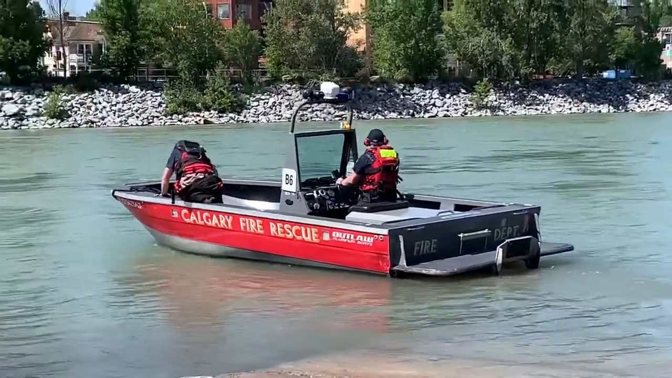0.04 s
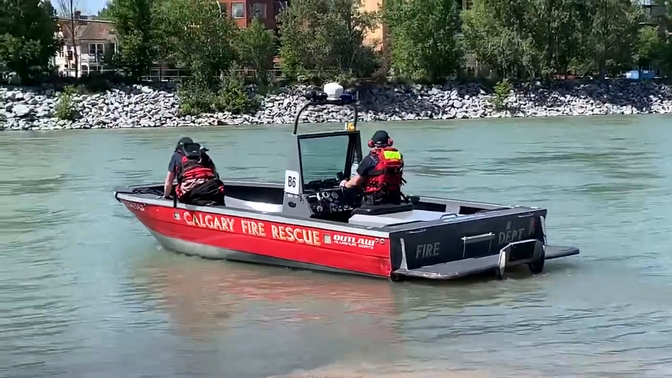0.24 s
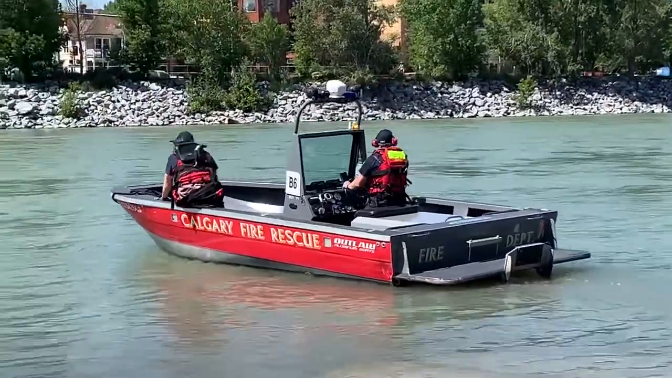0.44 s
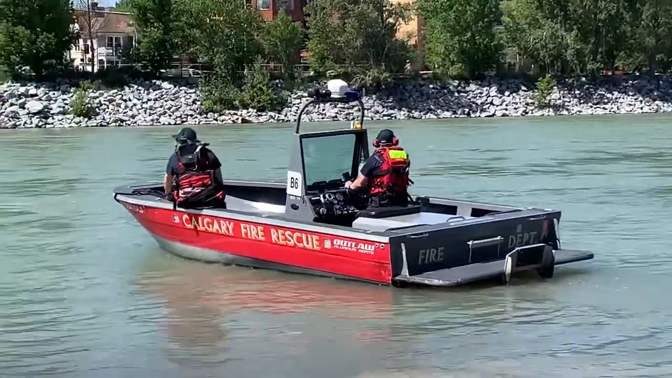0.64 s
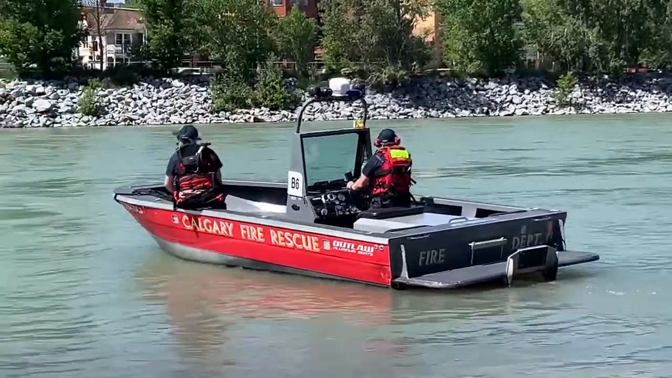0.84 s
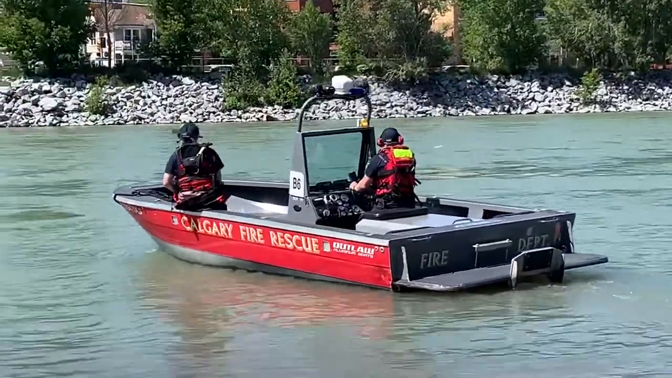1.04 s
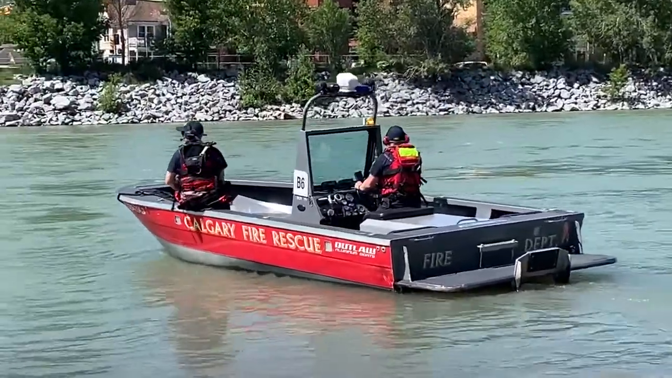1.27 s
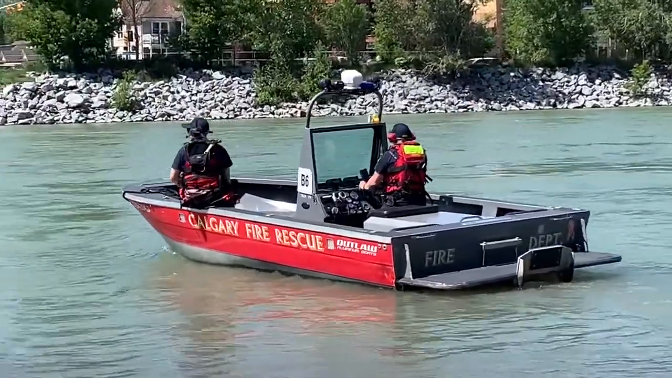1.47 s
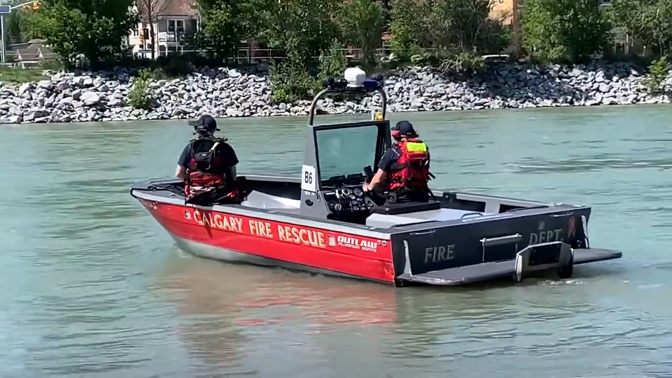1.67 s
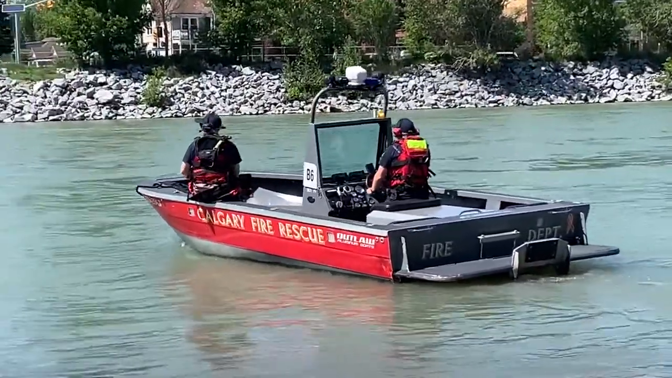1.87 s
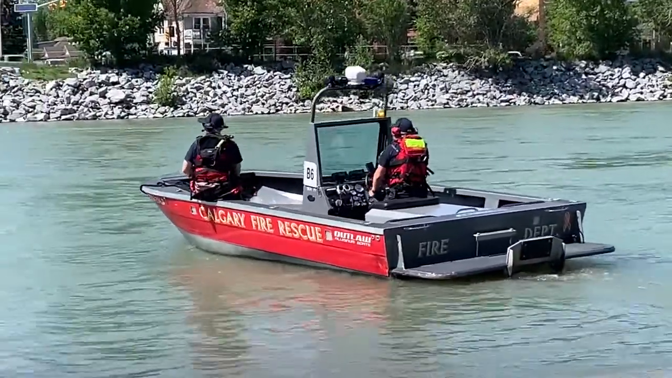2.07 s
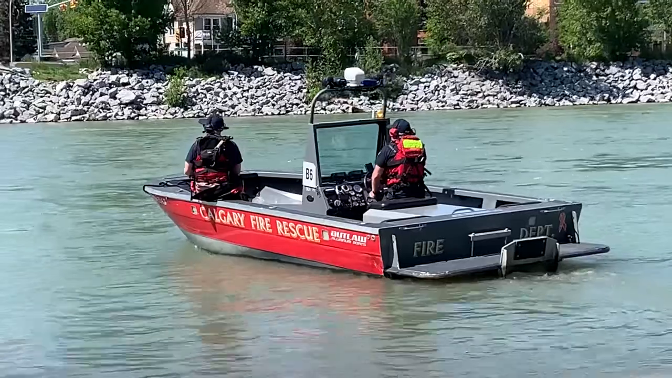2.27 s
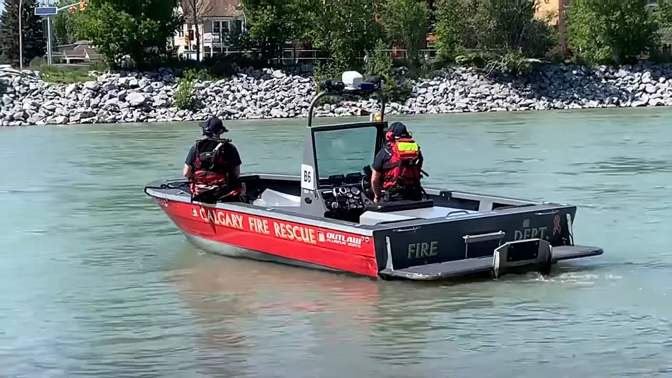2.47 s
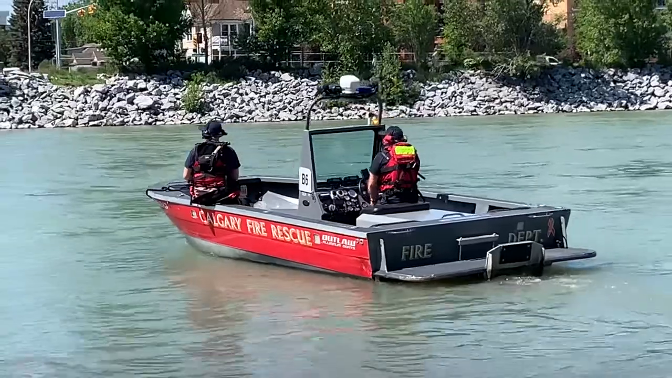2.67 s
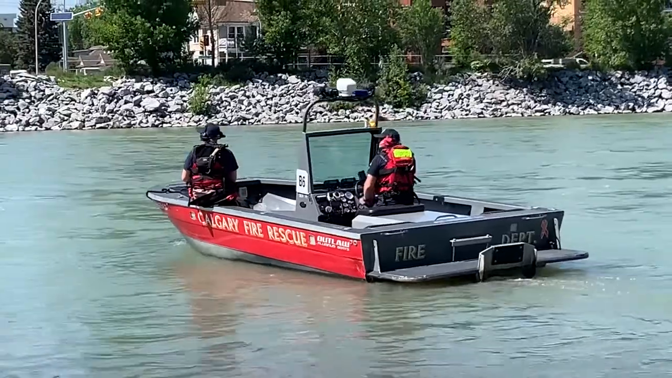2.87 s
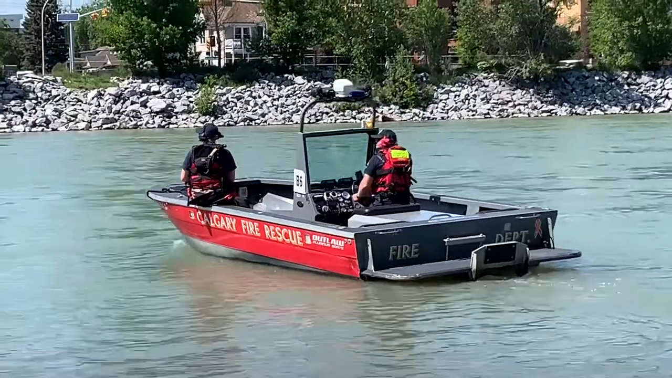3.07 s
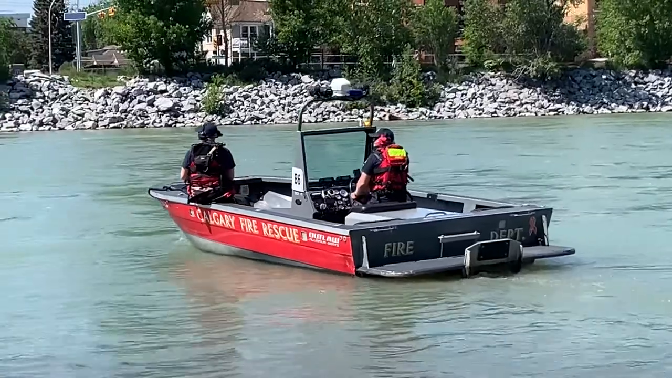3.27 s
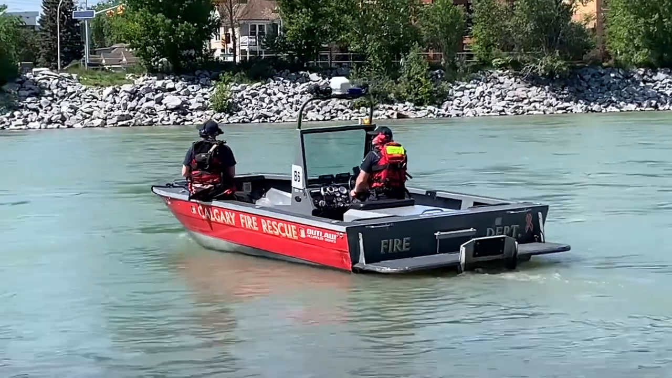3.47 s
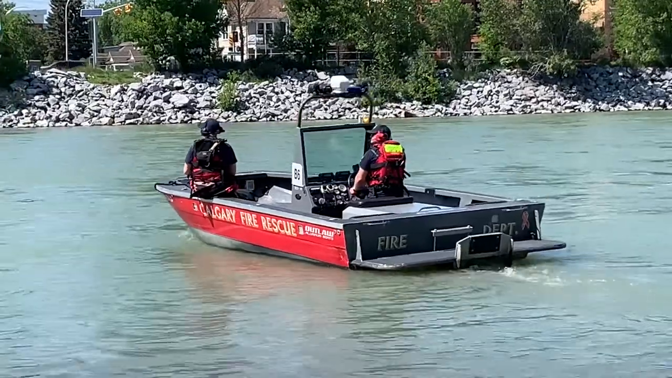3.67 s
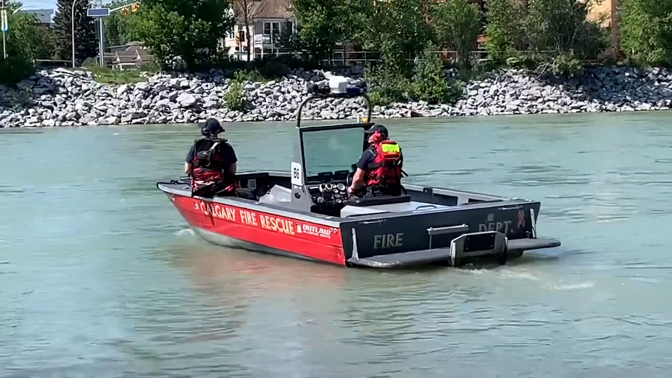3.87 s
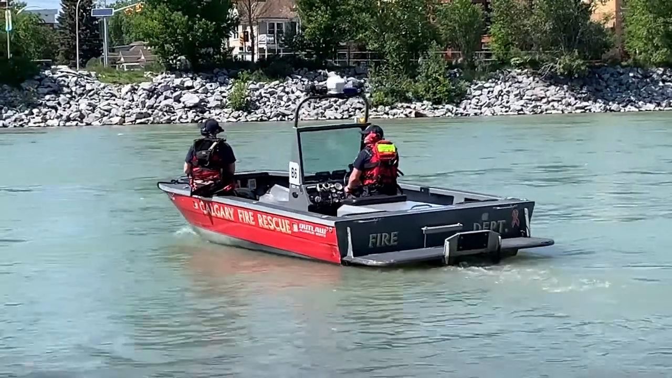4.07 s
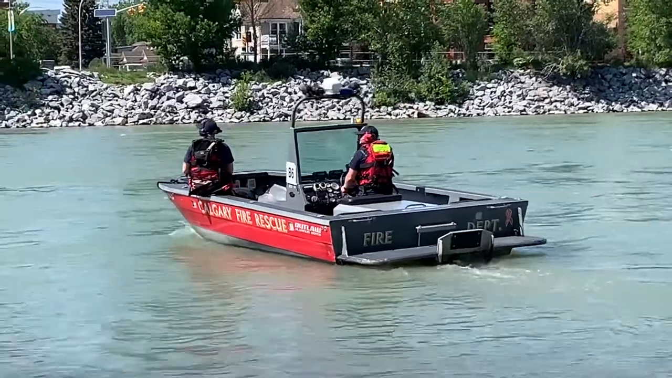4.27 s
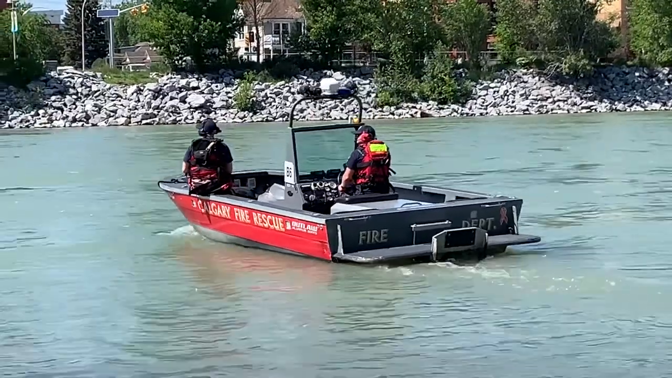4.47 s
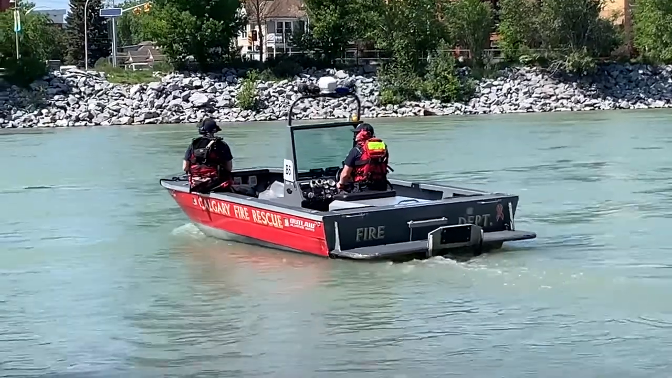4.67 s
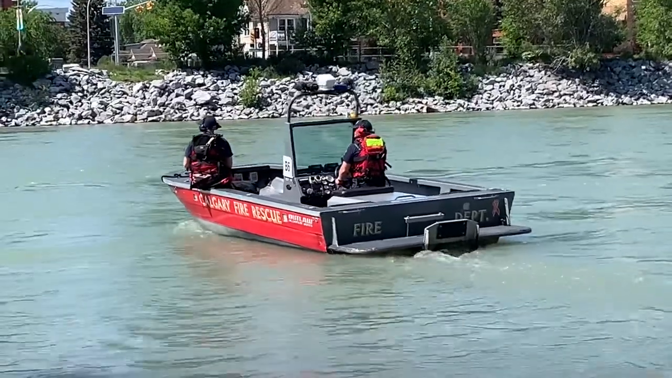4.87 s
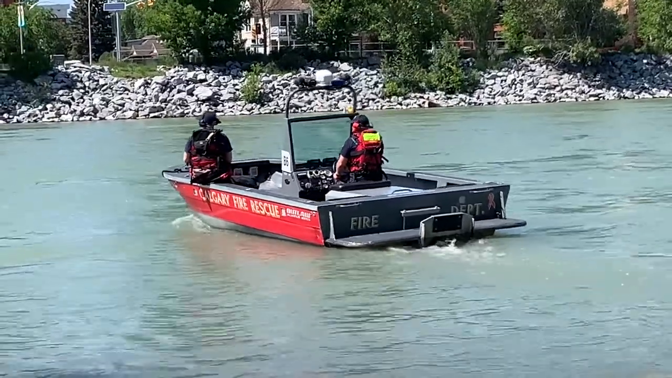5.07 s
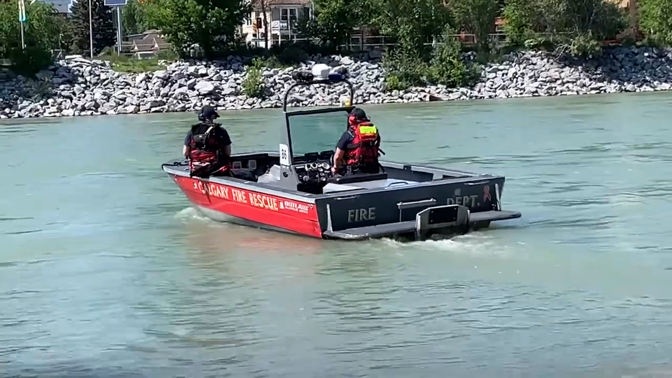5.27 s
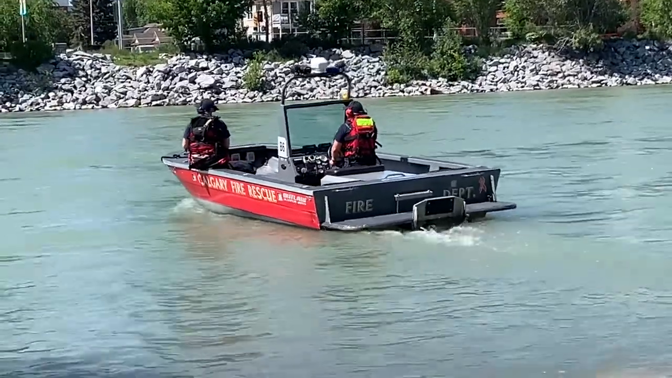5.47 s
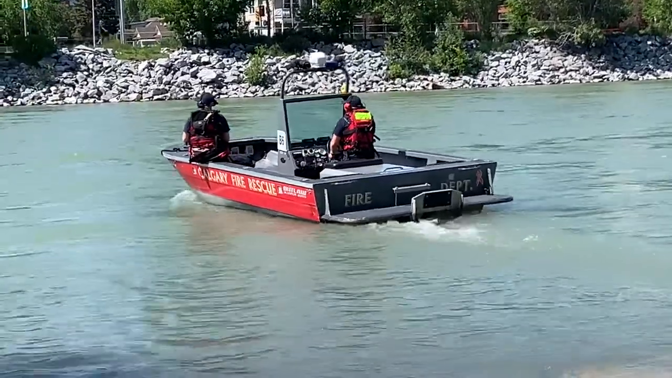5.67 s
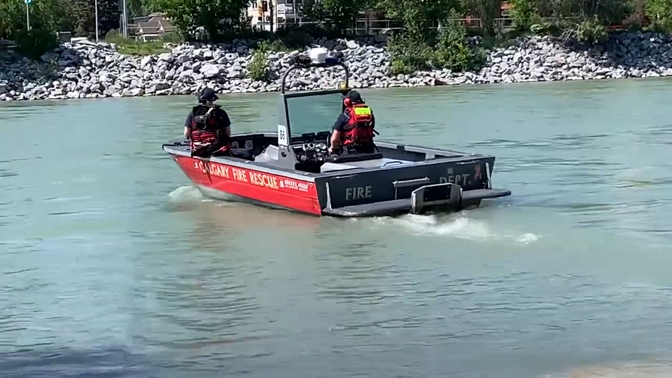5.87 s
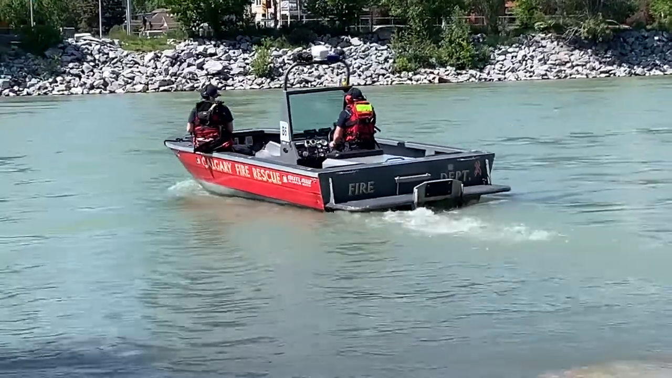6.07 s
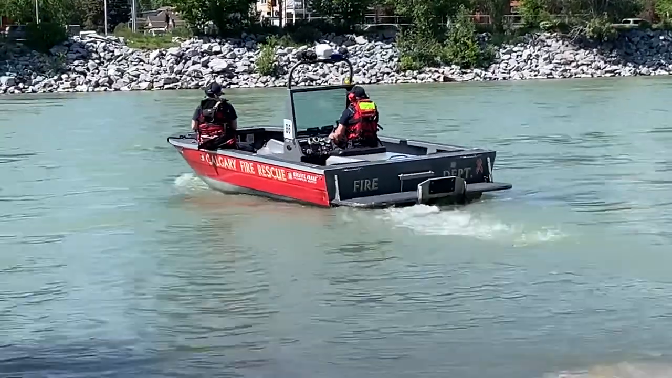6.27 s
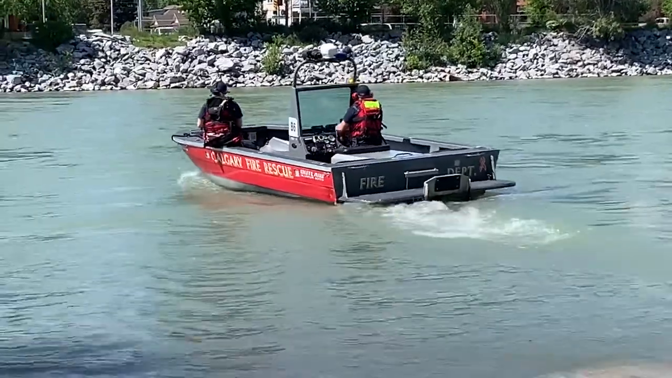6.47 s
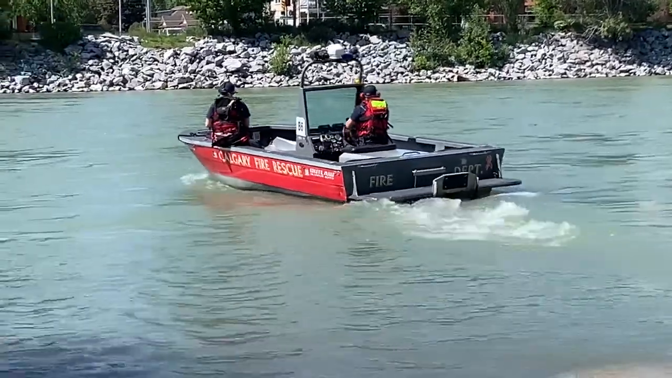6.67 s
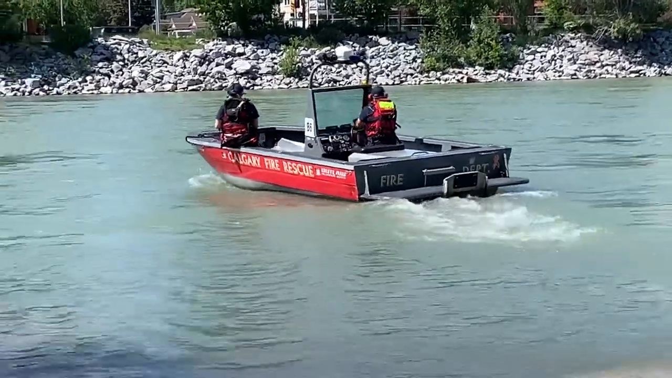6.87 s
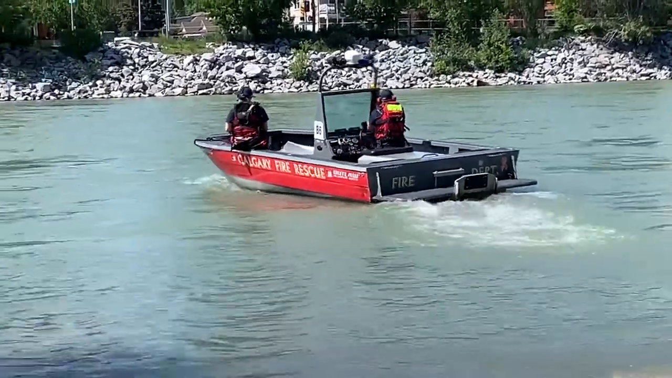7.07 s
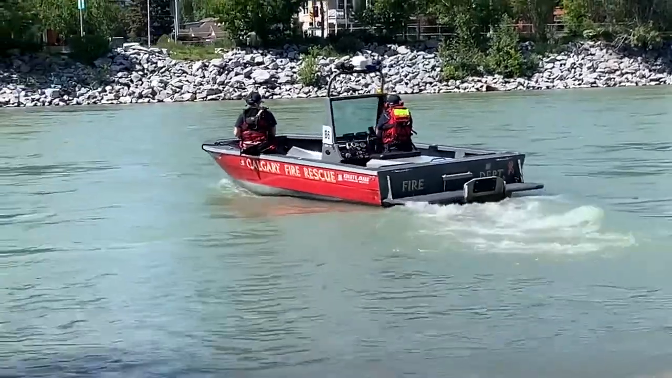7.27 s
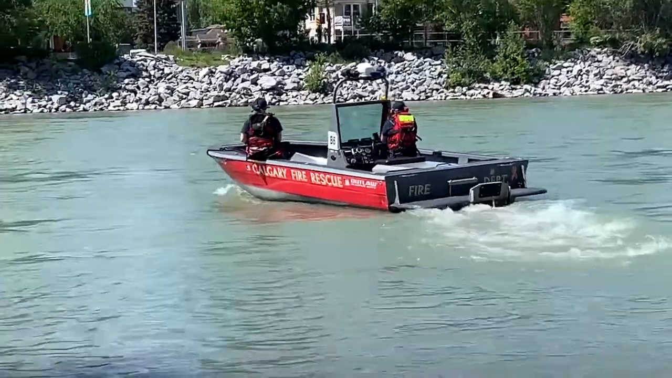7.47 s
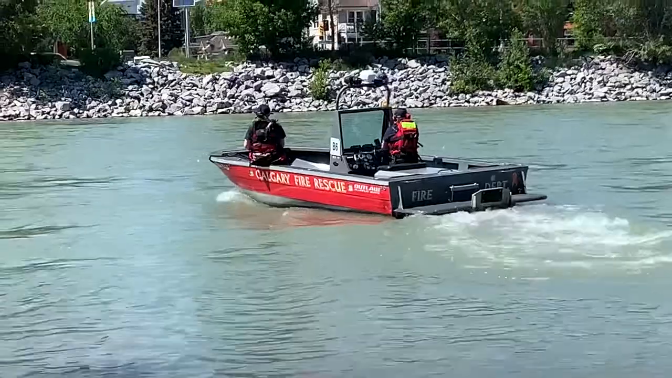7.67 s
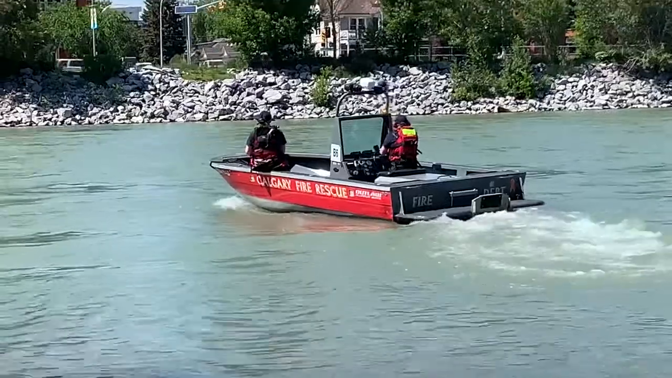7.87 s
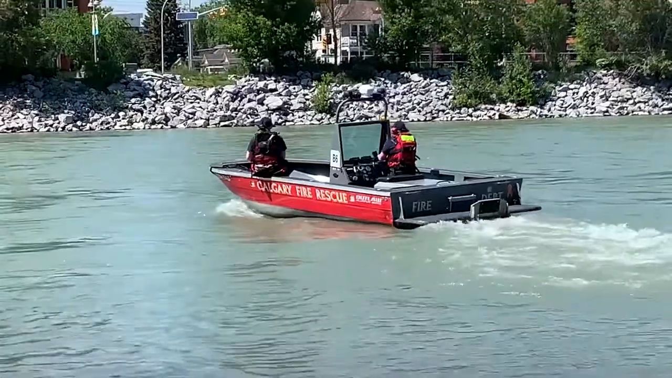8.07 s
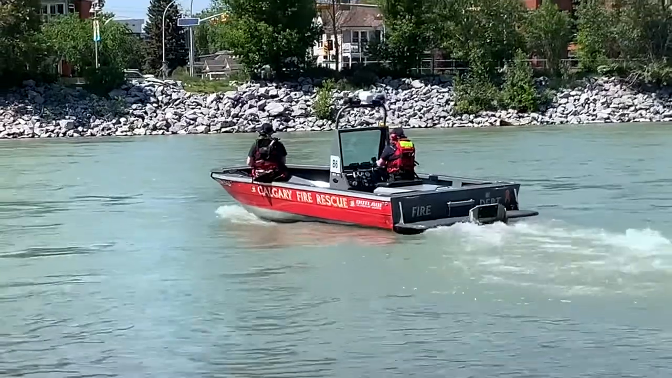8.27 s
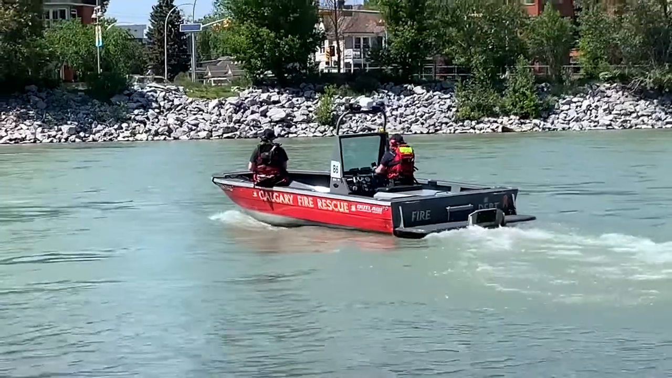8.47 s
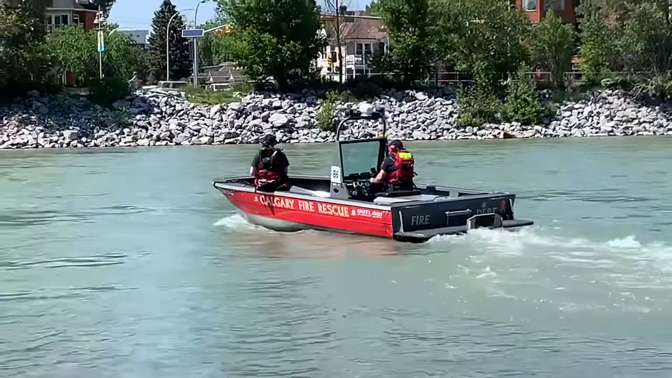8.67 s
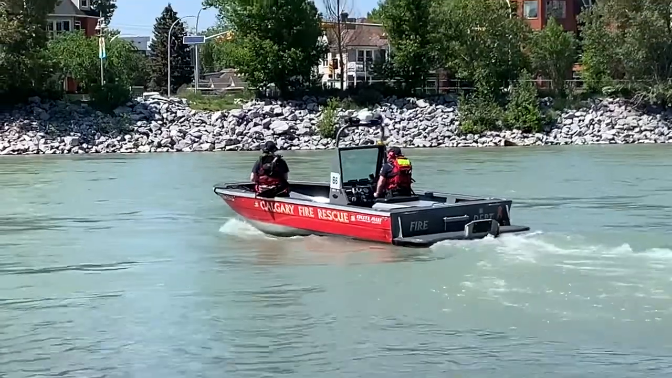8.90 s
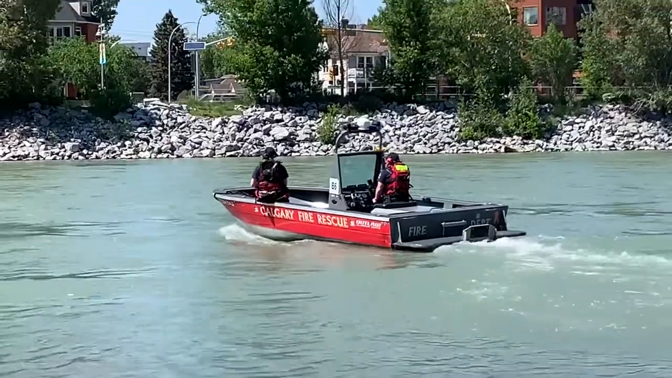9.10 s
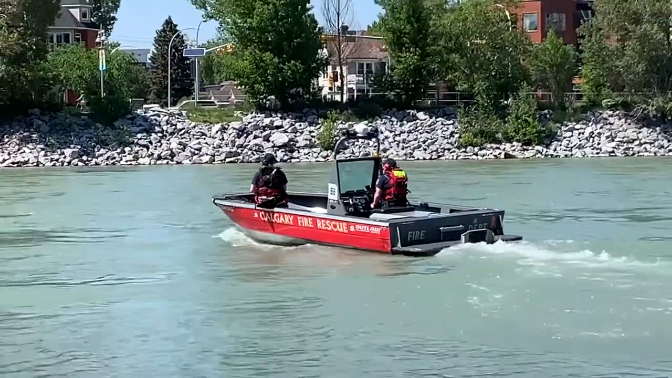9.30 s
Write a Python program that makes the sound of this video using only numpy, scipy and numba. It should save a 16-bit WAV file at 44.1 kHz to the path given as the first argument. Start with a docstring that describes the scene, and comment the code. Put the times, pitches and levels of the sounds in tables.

```python
"""A jet boat with a cross-plane V8 idles near a river bank, then opens up and pulls away from a phone on the shore.
Firings ring a wet exhaust through pipe modes, one cylinder pops once a cycle, and cooling water gurgles and spits.
The jet's churn, hiss and spray are coloured grainy noise; gas pockets thud as decaying sines.
Ripples hiss, slap and tick at the bank, a far bird calls in wavering partials, and the river rumbles wide."""
import sys
import numpy as np
from scipy import signal
from scipy.fft import rfft, irfft, next_fast_len
from scipy.io import wavfile
from scipy.ndimage import uniform_filter1d
from numba import njit

SR = 44100
rng = np.random.default_rng(int(sys.argv[2]) if len(sys.argv) > 2 else 0)


def waveform_to_disk(signal):
    """Save audio, clipped to [-1, 1], as 16-bit WAV at the path in sys.argv[1]."""
    frames = np.transpose(np.atleast_2d(signal))
    scaled = np.clip(frames, -1, 1) * 32767
    samples = np.round(scaled).astype(np.int16)
    wavfile.write(sys.argv[1], SR, samples)


N = 411894

CYCLE = 8  # firings per engine cycle
POP_PUSH_S, POP_LEAD_S = 6e-4, .0085  # spread of a pop's pressure push; push ahead of the pop moment


def undb(db):
    """Amplitude ratio from dB."""
    return 10 ** (np.asarray(db) / 20)


def level(x, db):
    """Scale to an RMS level."""
    return x * undb(db) / np.sqrt(np.mean(x ** 2))


def steady(x):
    """Divide out the RMS running over half a second."""
    return x / np.sqrt(uniform_filter1d(x ** 2, SR // 2))


def curves(rows):
    """Interpolate each table column over time at audio rate."""
    s, *columns = np.transpose(rows)
    return [np.interp(np.arange(N) / SR, s, c) for c in columns]


@njit
def resonate(x, g, k):
    """State-variable band-pass, gain 1 at the centre; the tuning may move every sample."""
    y, b, l, moves = np.empty(len(x)), 0., 0., len(g) > 1
    for i in range(len(x)):
        j = i * moves
        v = (b + g[j] * (x[i] + 1e-18 - l)) / (1 + g[j] * (g[j] + k[j]))
        b, l, y[i] = 2 * v - b, l + 2 * g[j] * v, k[j] * v
    return y


def svf(x, hz, width_hz):
    """Band-pass at a fixed or moving centre."""
    hz = np.atleast_1d(hz)
    return resonate(x, np.tan(np.pi * hz / SR), width_hz / hz)


def ring(x, modes):
    """Sum of parallel modes (pitch_hz, width_hz, gain_db)."""
    return sum(undb(db) * svf(x, hz, width) for hz, width, db in modes)


def twice(x, modes):
    """Two passes of the same modes: steeper skirts."""
    return ring(ring(x, modes), modes)


def thrice(x, modes):
    """Three passes of the same modes."""
    return ring(twice(x, modes), modes)


def hollow(sides, hz, width_hz):
    """Two-pass band of each channel."""
    return np.array([twice(side, [(hz, width_hz, 0)]) for side in sides])


def clicks(s, size, push_s):
    """Bell-shaped pressure pushes of the given spread at the given times."""
    at = np.clip(np.asarray(s) * SR, 0, N - 2)
    i = at.astype(int)
    # share each push between two samples for sub-sample timing
    train = np.bincount(i, size * (i + 1 - at), N) + np.bincount(i + 1, size * (at - i), N)
    return signal.oaconvolve(train, signal.windows.gaussian(257, push_s * SR), "same")


def walk(rate_hz):
    """Random levels held 1 / rate_hz and slewed twice; spread near 1."""
    k = int(SR / rate_hz)
    steps = np.repeat(rng.standard_normal(N // k + 1), k)
    return uniform_filter1d(uniform_filter1d(steps, k), k)[:N] * 4 / 3


def place(out, start_s, burst):
    """Add a burst at its start time."""
    i = int(start_s * SR)
    out[..., i:i + burst.shape[-1]] += burst


def water(colour, alike, grain_db, flicker_db, rate_hz):
    """Stereo noise of uneven grains in a given colour, RMS 1; alike is the left-right correlation."""
    size = next_fast_len(N)
    hz, db = np.transpose(colour)
    bin_hz = np.arange(size // 2 + 1) * SR / size
    gain = undb(np.interp(np.log(bin_hz + 1), np.log(hz), db, -90, -90))
    grains = rng.standard_normal((2, N)) * undb(grain_db * np.minimum(rng.exponential(1, (2, N)), 5))
    grains = grains * undb(flicker_db * walk(rate_hz))
    mid, side = irfft(rfft(grains, size) * gain, size)[:, :N]
    alike = np.clip(alike, -1, 1)
    return level(np.sqrt(1 + alike) * mid + np.sqrt(1 - alike) * side * np.array([[1], [-1]]), 0)


def river():
    """Deep wide rumble: low-coloured noise under a level curve."""
    # rumble level: time_s, level_db
    rumble = [(0, -28.5), (.6, -29), (1.3, -26), (2.0, -29.5), (2.5, -29.5), (3.4, -31.5), (4.7, -29),
              (6.0, -37), (6.6, -19.5), (7.6, -24.5), (8.3, -28), (9.34, -33)]
    # rumble colour: freq_hz, relative_db (per Hz)
    colour = [(15, -49), (25, -18.5), (53, 0.5), (81, -1.5), (207, -8), (421, -21), (548, -43),
              (769, -19.5), (1000, -49.5), (1300, -77), (2200, -120)]
    return undb(curves(rumble)[0]) * water(colour, 0.66, 2.5, 0.3, 7.7)


def bird():
    """Thin rising or level calls whose partials waver and flutter."""
    # calls: start_s, loudest_s, end_s, start_hz, end_hz, level_db, waver (share of pitch),
    # partials [(multiple of pitch, relative_db)]
    calls = [(0.15, 0.23, 0.45, 800, 875, -71, .007, [(3, 5), (4, 9), (7, 1)]),
             (0.735, 0.75, 0.775, 3050, 3330, -56, .006, [(1, 0)]),
             (4.82, 4.88, 4.93, 795, 832, -62, .005, [(4, 2), (6, 4), (8, -5)]),
             (4.9, 4.96, 5.015, 835, 905, -58, .004, [(3, 0), (4, 1), (6, 6), (7, -1)]),
             (4.985, 5.02, 5.05, 4700, 5250, -58, .03, [(.56, 5), (.7, 0), (1, 1), (1.3, -3)]),
             (7.95, 8.0, 8.05, 5060, 5060, -60, .006, [(1, 0)]),
             (8.42, 8.458, 8.5, 4750, 4860, -56, .015, [(1, 0)])]
    edge_db = -10  # ends of a call below its peak
    out, t = np.zeros(N), np.arange(N) / SR
    for start, loudest, end, hz, end_hz, db, waver, partials in calls:
        pitch_hz = np.interp(t, [start, end], [hz, end_hz]) * (1 + waver * walk(97))
        turn = 2 * np.pi * np.cumsum(pitch_hz) / SR
        parts = sum(undb(part_db + 3 * walk(80)) * np.sin(m * turn) for m, part_db in partials)
        swell_db = np.interp(t, [start, loudest, end], [edge_db, 0, edge_db])
        out += undb(db + swell_db) * (t > start) * (t < end) * parts
    return out * np.array([[1.2], [.8]])


def slaps():
    """Ripples slapping: a trapped pocket of air rings roughly at its pitch."""
    # slaps: start_s, level_db, pitch_hz
    events = [(0.135, -38, 1400), (0.207, -31.5, 1324), (0.2753, -46, 1440), (0.3634, -29.5, 1353),
              (0.41, -37, 1490), (0.5517, -41, 1505), (0.641, -38.5, 1330), (0.777, -35, 1300),
              (0.848, -38, 1480), (0.9896, -44, 1420), (1.05, -44, 1320), (1.519, -44, 1630),
              (1.665, -40, 1470), (2.004, -47, 1600), (2.3776, -39.5, 1466), (2.732, -37.5, 1570),
              (2.877, -35.5, 1400), (3.102, -41, 1500), (3.259, -44, 1640), (4.1975, -39, 1290),
              (4.6544, -35, 1780)]
    rise_s, t60_s = .0014, .091
    roughness, width = .9, .3  # noise against tone; noise width per pass as share of pitch
    out, t = np.zeros((2, N + SR)), np.arange(SR // 8) / SR
    swell = (1 - np.exp(-t / rise_s)) ** 2 * np.exp(-np.log(1000) * t / t60_s)
    for (s, db, hz), side_db in zip(events, rng.uniform(-2.9, 2, len(events))):
        noise = thrice(rng.standard_normal(len(t)), [(hz, width * hz, 0)])
        burst = swell * (np.sin(2 * np.pi * hz * t) + roughness * noise / noise.std())
        place(out, s, undb(db + np.array([[side_db], [-side_db]])) * burst / np.abs(burst).max())
    return out[:, :N]


def ticks():
    """Drops ticking close by: short bursts of bright noise, separate in each channel."""
    # ticks: start_s, level_db
    events = [(0.1531, -52), (0.7736, -57), (1.3798, -56), (1.434, -52), (1.453, -50), (1.622, -60),
              (2.578, -54), (2.6105, -57), (2.6364, -54), (3.898, -55), (4.2727, -57)]
    rise_s, decay_s = .0013, .0044
    low_db = 4.5  # gain of the part around 3-6 kHz
    out, t = np.zeros((2, N + SR)), np.arange(SR // 8) / SR
    for s, db in events:
        for channel in out:
            noise = rng.standard_normal(len(t)) * t / rise_s * np.exp(-t / decay_s)
            low = svf(svf(noise, 4800, 4000), 4300, 4000)
            place(channel, s, undb(db) * (svf(noise, 10000, 2360) + undb(low_db) * low))
    return out[:, :N]


def ripples():
    """Bank ripples: bright noise plus bands of it that flicker alone, RMS 1."""
    # ripple colour: freq_hz, relative_db (per Hz)
    colour = [(1120, -37), (1900, 0.5), (2660, -2.5), (3320, -2.5), (3640, -3), (3930, -3), (4330, -3),
              (4740, -7), (5480, -7), (6600, -12), (8000, -24), (10400, -58.5), (17600, -120)]
    bands_hz, width_hz = (2500, 3250, 4000, 4750, 6400), 420
    lap = water(colour, -.1, 3.1, 1.3, 45)
    out = .7 * lap
    for hz in bands_hz:
        out = out + undb(2.5 * walk(24)) * np.array([svf(side, hz, width_hz) for side in lap])
    return level(out, 0)


def jet_stream():
    """Hiss of the jet with hollow colours that sag and drift as the boat draws off."""
    # hiss colour: freq_hz, relative_db (per Hz)
    colour = [(1120, -33), (1900, -3), (2160, -6), (2420, -5), (3070, -6), (3660, -6), (4010, -4),
              (4440, -12), (4860, -10), (5610, -13), (6290, -8), (6920, -12), (8000, -23), (10400, -53),
              (17600, -120)]
    # hollow colours: time_s, upper_hz, upper_db, middle_hz, middle_db, lower_hz, lower_db
    jet_tones = [(5, 3540, 0, 2830, 2, 2400, -15), (5.3, 3460, 13, 2870, 1, 2400, -12.5),
                 (5.9, 3560, 3.5, 2860, -9.5, 2390, -15), (6.6, 3450, 6, 2830, -2, 2350, -8),
                 (7.5, 3500, 2.5, 2850, 4.5, 2400, -12), (8.5, 3300, 5, 2680, 0.5, 2370, 0.5),
                 (9.34, 3340, 7.5, 2780, -9.5, 2400, 3.5)]
    width_hz = 370  # per pass
    plain = water(colour, -0.032, 4.0, 1.4, 30)
    stream, tones = plain, curves(jet_tones)
    for hz, db in zip(tones[::2], tones[1::2]):
        stream = stream + undb(db + 2.2 * walk(9)) * hollow(plain, hz, width_hz)
    return stream


def churn(churn_db, jet):
    """Wash churned by the jet, with hollow-sounding froth that follows the jet share."""
    # churn colour: freq_hz, relative_db (per Hz)
    colour = [(530, 1), (900, 1.5), (1090, -3.5), (1370, 2), (1690, 0), (1790, -1.5), (1910, -42.5),
              (2000, -26.5), (2600, -58), (4400, -120)]
    froth_hz, froth_width_hz, froth_db = 785, 130, .5  # width per pass; level against the churn
    wash = undb(churn_db) * water(colour, 0.27, 3.4, 1.8, 25) * undb([[.7], [-.7]])
    froth = hollow(water(colour, 0.39, 2.2, 2.5, 12), froth_hz, froth_width_hz)
    return wash + jet * undb(churn_db + froth_db) * level(froth, 0)


def spray(spray_db):
    """Fine spray: noise in the top treble."""
    # spray colour: freq_hz, relative_db (per Hz)
    colour = [(5180, -47), (8800, -19), (9390, -4), (10100, 0), (12400, -7), (13600, -21), (14700, -6),
              (15600, -7.5)]
    return undb(spray_db) * water(colour, -0.32, 3.2, 2.2, 25)


def thuds():
    """Gas pockets thudding out under water at idle: each rings low for a few cycles."""
    # thuds: start_s, relative_db, pitch_hz
    events = [(0.248, -13, 110), (0.532, -13.5, 126), (0.618, -13, 86), (0.72, -10, 71), (1.021, -13, 85),
              (1.078, -13, 61), (1.199, -13, 61.9), (1.299, -18, 141), (1.587, -14, 70.0),
              (1.787, -14, 104), (1.988, -12.5, 60.7), (2.145, -18, 86), (2.275, -14, 127),
              (2.624, -13, 102), (2.912, -12.5, 141.6), (3.129, -16, 80.7)]
    rise_s, t60_s, gain_db = .008, .13, -4
    out, t = np.zeros(N + SR), np.arange(SR // 4) / SR
    swell = (1 - np.exp(-t / rise_s)) * np.exp(-np.log(1000) * t / t60_s)
    for s, db, hz in events:
        burst = swell * np.sin(2 * np.pi * hz * t)
        place(out, s, undb(db + gain_db) * burst / np.abs(burst).max())
    return out[:N]


def spits():
    """Hard spits of exhaust water: a click and a short rough tail around a pitch of their own."""
    # spits: start_s, peak_db, pitch_hz
    events = [(0.135, -39, 610), (0.212, -31, 821), (0.357, -21, 452), (0.407, -29, 765), (0.48, -26, 474),
              (0.552, -22, 470), (0.648, -37, 460), (0.715, -27, 452), (0.865, -31, 452), (0.939, -34, 859),
              (1.008, -26, 791), (1.023, -25, 452), (1.139, -34, 463), (1.523, -26.5, 760),
              (1.939, -39, 770), (3.004, -38, 500), (3.1, -36, 487), (3.81, -32, 448), (4.199, -23, 713),
              (4.457, -28, 573), (4.611, -42.5, 692), (4.656, -31, 528), (4.872, -29, 676),
              (4.896, -23, 670), (4.996, -26, 646), (5.032, -19, 490), (5.151, -23, 519), (5.269, -26, 530),
              (7.076, -27.5, 452), (7.75, -23, 510), (8.367, -33, 452), (9.214, -24, 730)]
    width, t60_s, click_s = .45, .03, .00012  # width of the first pass as share of pitch
    out, t = np.zeros(N + SR), np.arange(SR // 16) / SR
    for s, db, hz in events:
        tail = np.exp(-np.log(1000) * t / t60_s) * rng.standard_normal(len(t))
        push = tail + 6 * np.exp(-t / click_s)
        burst = svf(svf(push, hz, width * hz), hz, 2 * width * hz)
        place(out, s, undb(db) * burst / np.abs(burst).max())
    return out[:N]


def gurgle(at, gurgle_db):
    """Cooling water spits with each firing, some much harder than others, and comes in lumps."""
    # gurgle modes: pitch_hz, width_hz (per pass), gain_db (per pass)
    modes = [(389.5, 131, 6), (490, 80, 3), (625, 110, -7), (686.4, 124, 3), (805, 43, -4)]
    lump_db = 3
    size = undb(4.2 * rng.standard_normal(len(at))) * np.sign(rng.standard_normal(len(at)))
    puffs = clicks(at, size, .00061) + .53 * rng.standard_normal(N)
    return undb(gurgle_db + lump_db * walk(13)) * steady(twice(puffs, modes))


def bark(at, firing_db):
    """The cylinder three before the pop rings higher, below the pop's level."""
    modes, bark_db = [(391.8, 30, 0)], -13
    unit = np.abs(twice(clicks([.01], 1., POP_PUSH_S), modes)).max()
    size = undb(firing_db + bark_db + 2 * rng.standard_normal(len(at)))
    return twice(clicks(at, size, POP_PUSH_S), modes) / unit


def pops(k, beat, firing_db):
    """One cylinder in eight pops; gas rushes after each push and the modes wander in pitch."""
    # pops that stand out: time_s, level_db
    hard_pops = [(3.926, -18), (4.323, -15), (4.46, -25.5), (4.591, -17), (4.719, -21.5), (4.828, -16.5),
                 (4.94, -9.5), (5.031, -8.5), (5.126, -7), (5.213, -8.5), (5.296, -10), (5.381, -7),
                 (5.465, -16.5), (5.561, -11.5), (5.641, -20), (5.712, -10), (5.951, -11), (6.114, -6),
                 (6.274, -6.5), (6.355, -23.5), (6.433, -7.5)]
    # pop modes: pitch_hz, width_hz (per pass), gain_db (per pass)
    modes = [(267, 72.4, 1.5), (296, 19, -9)]
    wander, roughness, tail_s = .045, .12, .014  # wander as share of pitch
    hard_s, hard_db = np.transpose(hard_pops)
    # regular pops leave room around the hard ones
    one = (k % CYCLE == 0) & (np.abs(beat[:, None] - hard_s).min(axis=1) > .04)
    size = undb(firing_db + 1.2 * rng.standard_normal(len(k)))[one]
    push = clicks(beat[one] - POP_LEAD_S, size, POP_PUSH_S)
    push += clicks(hard_s - POP_LEAD_S, undb(hard_db), POP_PUSH_S)
    unit = np.abs(thrice(clicks([.01], 0.93, POP_PUSH_S), modes)).max()
    rush = signal.lfilter([1 / (POP_PUSH_S * SR)], [1, -np.exp(-1 / (tail_s * SR))], push)
    push += roughness * svf(rng.standard_normal(N), 260, 560) * 8 * rush
    bend = 1 + wander * walk(12)
    return thrice(push, [(hz * bend, width, db) for hz, width, db in modes]) / unit


def exhaust(k, at, scatter_db, throttle):
    """Firings and bank imbalance ring the pipes over a sub rumble; levelled over half a second."""
    # pipe modes rung by all firings: pitch_hz, width_hz, gain_db
    pipe = [(89.5, 29.8, 12.5), (277, 42, -17), (427, 55, -26.5)]
    # pipe modes rung by the bank imbalance: pitch_hz, width_hz, gain_db
    cross_pipe = [(58, 19, -27.5), (144.2, 24, 22), (175, 22, 7), (268, 37, -39.5)]
    # left or right bank (sign), in firing order
    bank = [1, -1, 1, 1, -1, 1, -1, -1]
    # strength of each cylinder in firing order: relative_db
    cylinder_db = [0, -.5, -4.5, 1, 2, .5, .5, -.5]
    # against the firing tone, at (closed, part, open) throttle
    cross_db, sub_db = (-7.5, 3, -3.5), (-4, -13, -17)
    # weak firings are common, a full charge is the limit
    chance = np.clip(rng.standard_normal(len(k)), -2, 1)
    size = undb(scatter_db * chance + np.array(cylinder_db)[k % CYCLE])
    pipes = level(ring(clicks(at, size, .00054), pipe), 0)
    cross = ring(clicks(at, size * np.array(bank)[k % CYCLE], .00053), cross_pipe)
    pipes += undb(throttle(cross_db)) * level(cross, 0)
    # gas bubbling out under water thumps below the firing tone
    sub = ring(rng.standard_normal(N), [(70, 6.7, 2.5), (141, 110, 25)])
    pipes += undb(throttle(sub_db)) * level(svf(sub, 110, 160), 0)
    return steady(pipes)


def engine(gurgle_db):
    """Firings, bank imbalance, pops and gurgle timed by the crank; thuds and spits at their own times."""
    # firing rate: time_s, rate_hz
    speed = [(0, 46), (3.3, 46), (3.9, 61.26), (4.6, 59.91), (4.8, 70.63), (5.0, 86.36), (5.3, 94.7),
             (5.6, 97.84), (6.0, 100.05), (7.0, 99.97), (7.6, 101.33), (8.3, 101.38), (9.34, 101.7)]
    # levels: time_s, exhaust_db, pop_db (once-a-cycle pop)
    loudness = [(0, -20, -55), (.2, -39, -52), (.45, -26, -48), (.6, -22.5, -53), (.9, -32, -37),
                (1.1, -27, -41), (1.5, -32, -41), (1.85, -26, -30), (2.55, -29.5, -42), (2.7, -24.5, -40),
                (2.95, -28, -42), (3.41, -29.5, -46), (3.65, -23.5, -34.5), (4.55, -25.5, -25.5),
                (4.97, -15.5, -21), (5.25, -15, -30), (5.37, -8.5, -13), (5.47, -16.5, -21),
                (5.58, -10, -13), (6.0, -11.5, -15), (6.8, -10, -11.5), (7.6, -9.5, -12.5),
                (8.0, -11.5, -12.5), (9.34, -11, -13)]
    # lope, a swing over two cycles: time_s, exhaust_swing_db, pop_swing_db
    lope_swing = [(5.5, 1, -5), (5.6, 1, -1.5), (6.0, 5.5, 2.5), (6.35, 3.5, 4), (6.6, -0.5, 3),
                  (6.85, 0.5, 0)]
    pop_s, fire_lead = 3.935, -.09  # moment of one pop; lead of the firings on the pop grid (firing gaps)
    lope_s, lope_lead = 6.108, 1.8  # moment of a strong pop; lead of the exhaust swell (firing gaps)
    # at (closed, part, open) throttle: firing rate, strength scatter, time scatter, level wander
    throttle_hz, scatter_db = (46, 62, 100), (3.5, 2.5, 1.7)
    slip_gaps, lump_db, lump_rate_hz = (.25, .2, .03), (3.5, 1, .3), 9
    t = np.arange(N) / SR
    firing_hz = curves(speed)[0]

    def throttle(settings):
        return np.interp(firing_hz, throttle_hz, settings)

    fired = np.cumsum(firing_hz) / SR  # running count of firings, 0 at a pop
    fired -= np.interp(pop_s, t, fired)
    k = np.arange(np.ceil(fired[0]), fired[-1]).astype(int)
    beat = np.interp(k, fired, t)
    slip = np.interp(beat, t, throttle(slip_gaps)) * rng.standard_normal(len(k))
    at = np.interp(k - fire_lead + slip, fired, t)

    exhaust_db, pop_db = curves(loudness)
    swing_db, pop_swing_db = curves(lope_swing)
    lope = 2 * np.pi * (fired - np.interp(lope_s, t, fired)) / (2 * CYCLE)
    exhaust_db += swing_db * np.cos(lope + np.pi * lope_lead / CYCLE)
    exhaust_db += throttle(lump_db) * walk(lump_rate_hz)
    pop_db += pop_swing_db * np.cos(lope)
    firing_db = np.interp(beat, t, pop_db)

    early = k % CYCLE == 5
    out = undb(exhaust_db) * exhaust(k, at, np.interp(beat, t, throttle(scatter_db)), throttle)
    out += pops(k, beat, firing_db) + bark(at[early], firing_db[early])
    return out + thuds() + spits() + gurgle(at, gurgle_db)


def scene():
    """Mix river, bank, bird and wash with the engine panned and delayed to the right."""
    # water levels: time_s, gurgle_db, churn_db, hiss_db, spray_db
    wash_levels = [(0, -42, -49, -54.5, -69), (.54, -46, -47.5, -57, -72.5), (3.33, -51, -46, -57, -71.5),
                   (3.67, -38.5, -48, -56, -71), (4.81, -37, -42.5, -55, -70),
                   (5.0, -28.5, -44, -54.5, -68.5), (5.5, -31, -41.5, -55, -66.5),
                   (7.08, -32, -39.5, -53.5, -59.5), (7.7, -31.5, -39, -52.5, -61),
                   (8.4, -30.5, -43, -52.5, -61.5), (9.34, -28, -43.5, -56.5, -66.5)]
    # boat pan: time_s, left_minus_right_db
    pan = [(0, 0.5), (.54, 0.5), (3.4, 0.5), (5.0, -2), (9.34, -2)]
    # jet share of the hiss: time_s, power_share
    jet_share = [(0, 0.074), (4.6, 0.064), (5.4, 0.4), (9.34, 0.92)]
    lag_s = 9e-5  # the right port hears the boat later
    gurgle_db, churn_db, hiss_db, spray_db = curves(wash_levels)
    pan_db = curves(pan)[0]
    jet = np.clip(curves(jet_share)[0], 0, 1)
    hiss = undb(hiss_db) * (np.sqrt(1 - jet) * ripples() + np.sqrt(jet) * jet_stream())
    wash = churn(churn_db, jet) + hiss + spray(spray_db)
    boat = engine(gurgle_db)
    late = np.interp(np.arange(N) - lag_s * SR, np.arange(N), boat)
    near = np.array([boat, late]) * undb(np.array([pan_db, -pan_db]) / 2)
    return river() + bird() + slaps() + ticks() + wash + near


def record(dry):
    """The phone rounds the peaks, drops the deepest bass and cuts the top."""
    bass_hz, top_hz = 42, 15750
    bass = signal.butter(4, bass_hz, "high", fs=SR, output="sos")
    top = signal.ellip(8, .2, 70, top_hz, fs=SR, output="sos")
    return signal.sosfilt(np.vstack([bass, top]), np.tanh(0.61 * dry) / 0.81)


dry = scene()
out = record(dry)
waveform_to_disk(out)
```